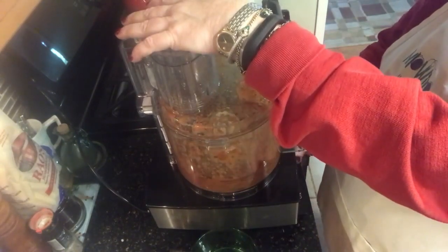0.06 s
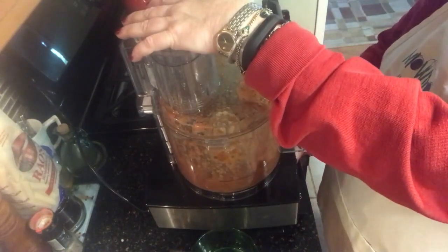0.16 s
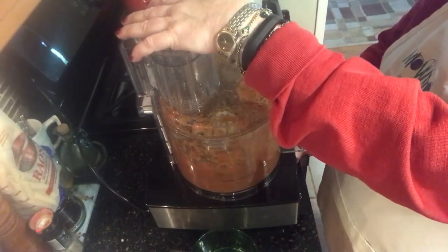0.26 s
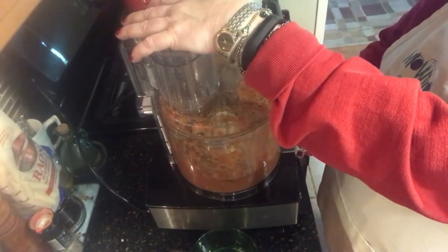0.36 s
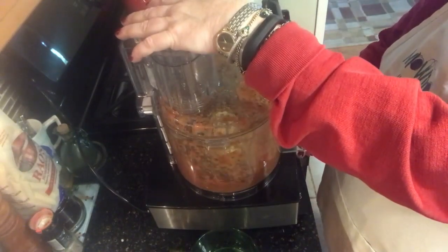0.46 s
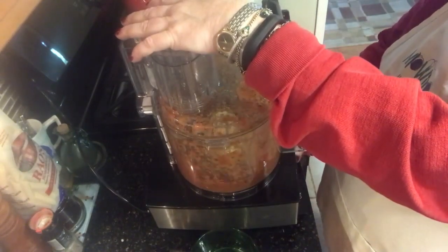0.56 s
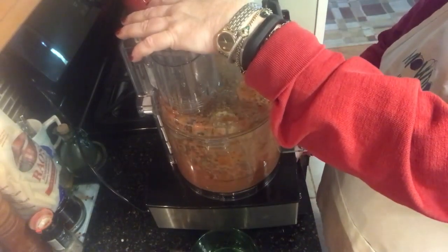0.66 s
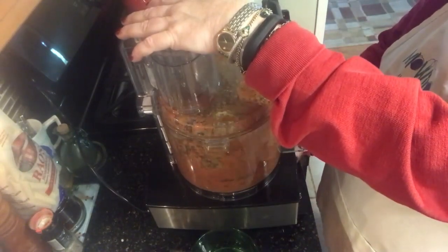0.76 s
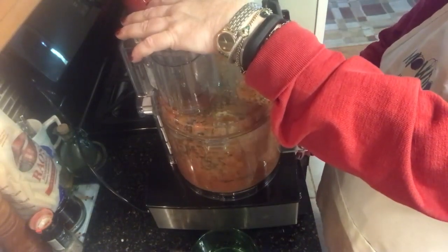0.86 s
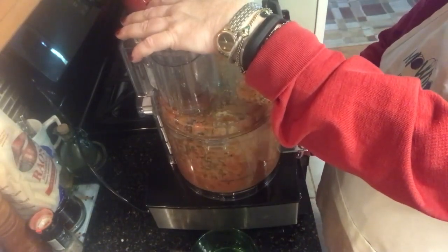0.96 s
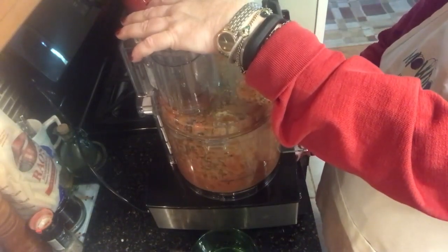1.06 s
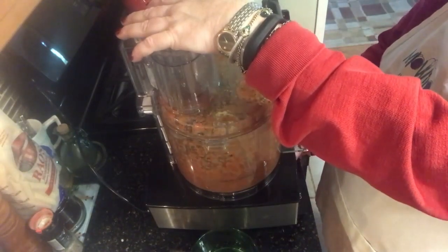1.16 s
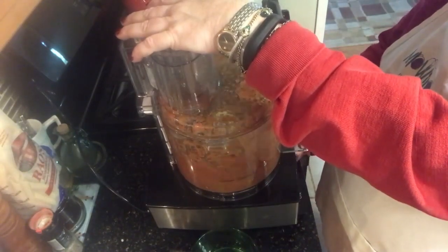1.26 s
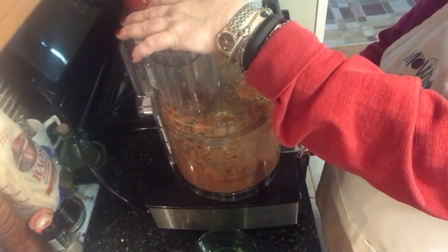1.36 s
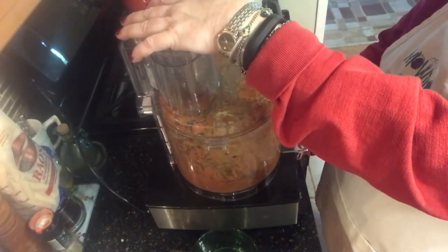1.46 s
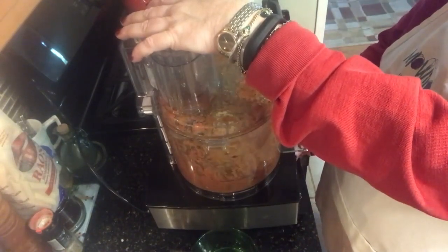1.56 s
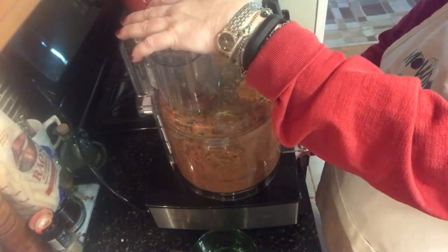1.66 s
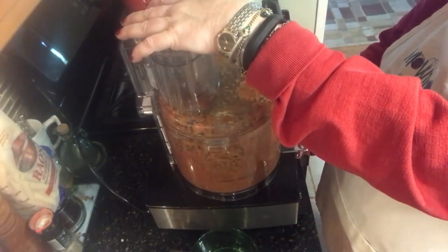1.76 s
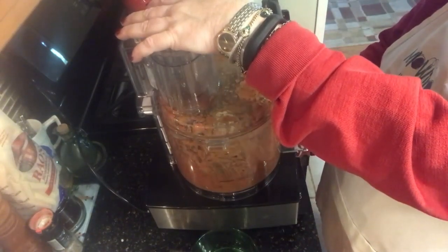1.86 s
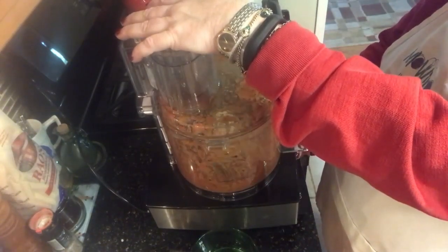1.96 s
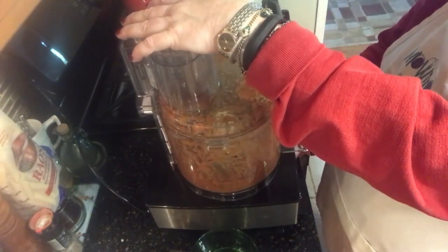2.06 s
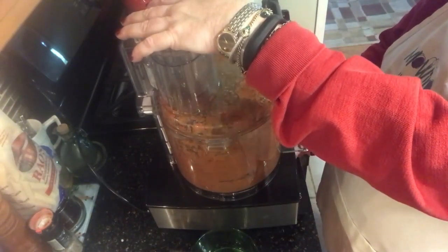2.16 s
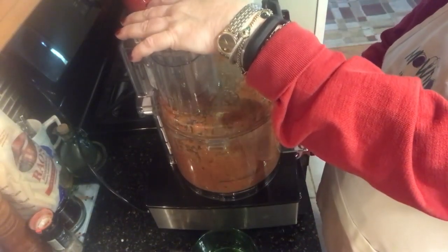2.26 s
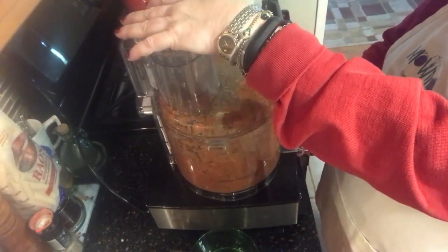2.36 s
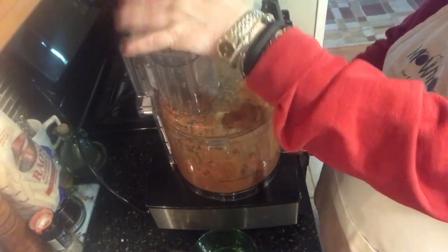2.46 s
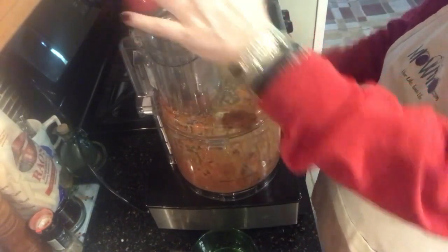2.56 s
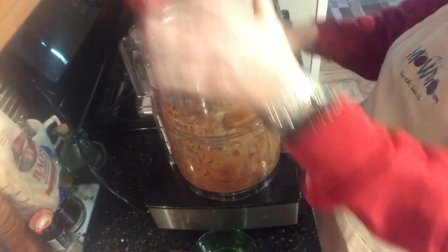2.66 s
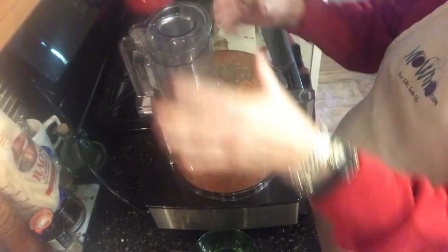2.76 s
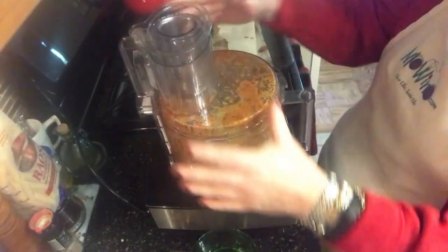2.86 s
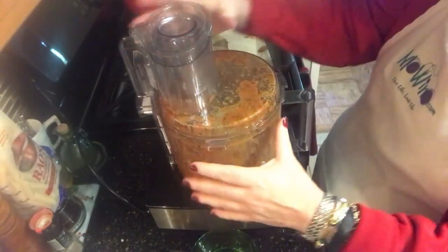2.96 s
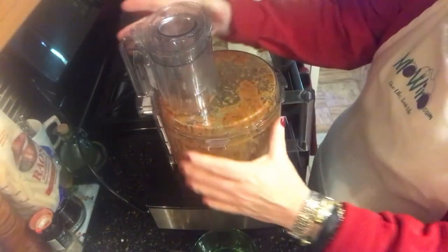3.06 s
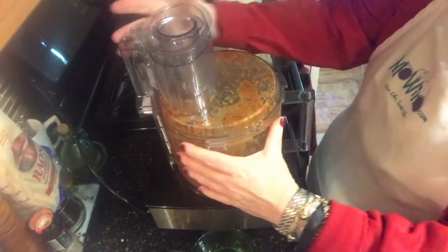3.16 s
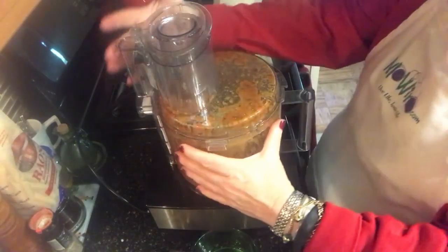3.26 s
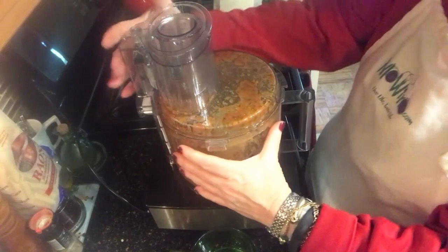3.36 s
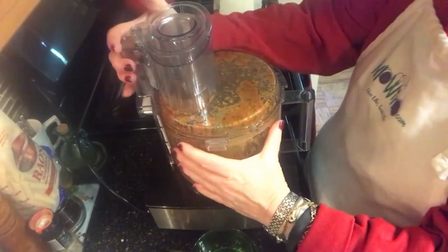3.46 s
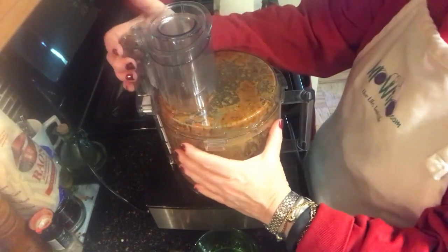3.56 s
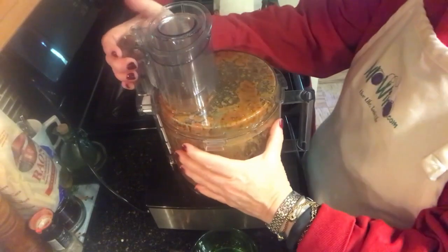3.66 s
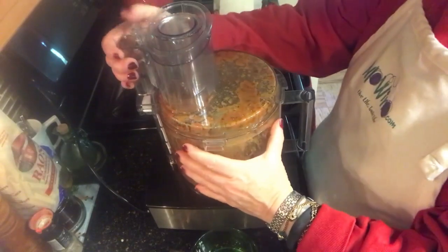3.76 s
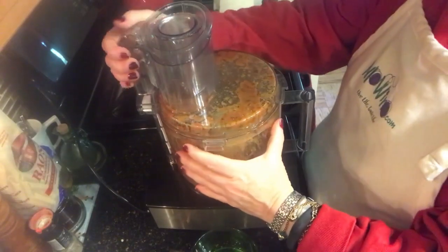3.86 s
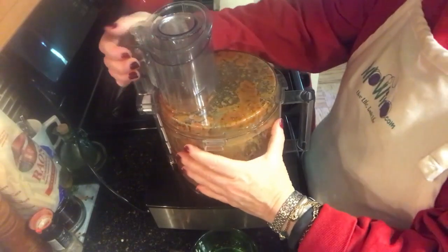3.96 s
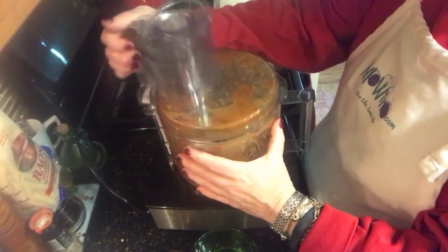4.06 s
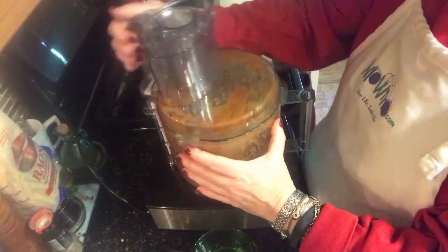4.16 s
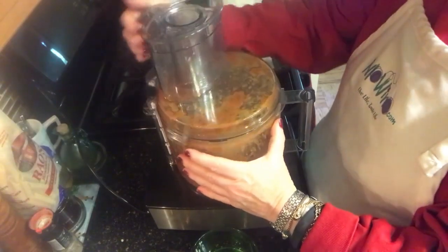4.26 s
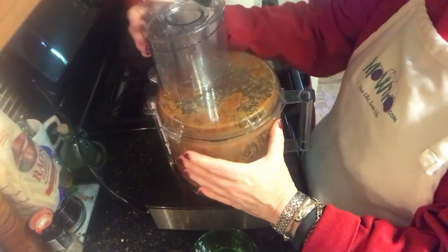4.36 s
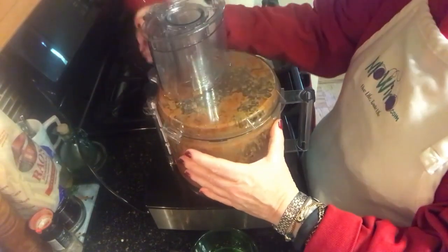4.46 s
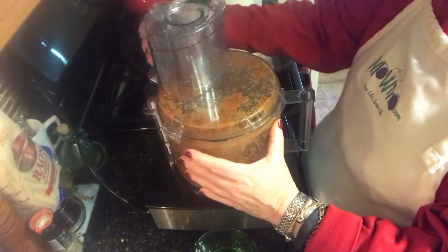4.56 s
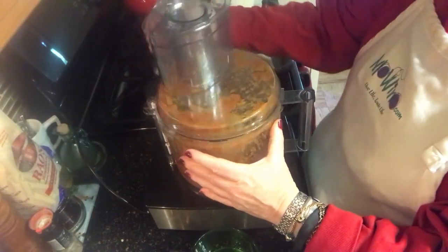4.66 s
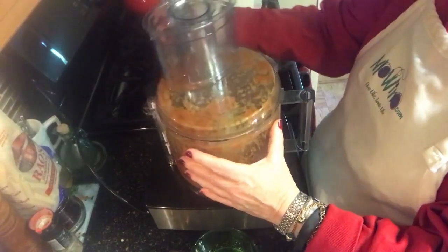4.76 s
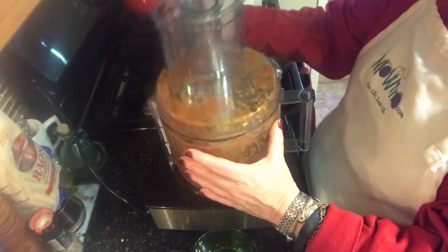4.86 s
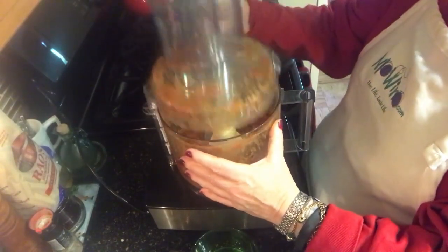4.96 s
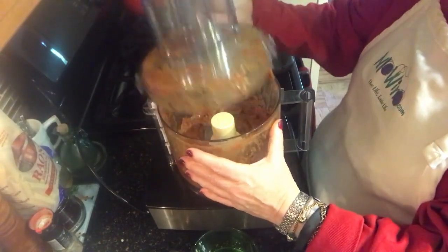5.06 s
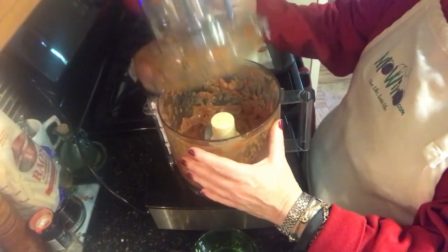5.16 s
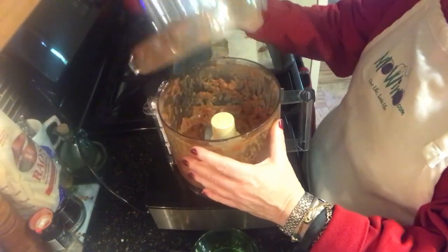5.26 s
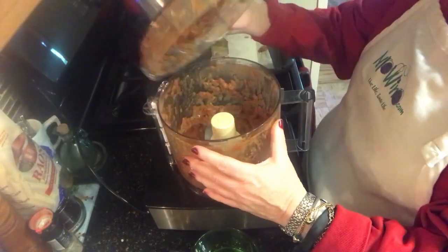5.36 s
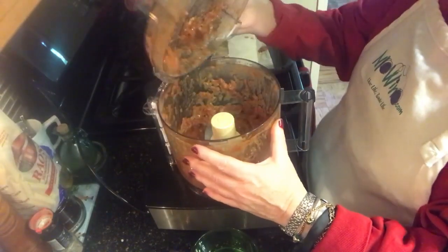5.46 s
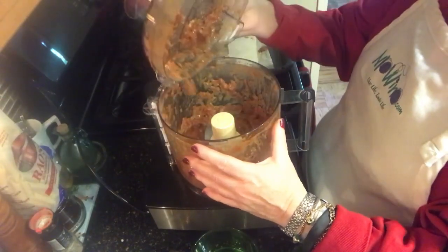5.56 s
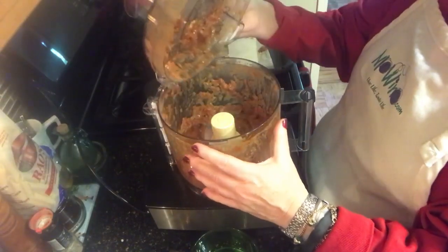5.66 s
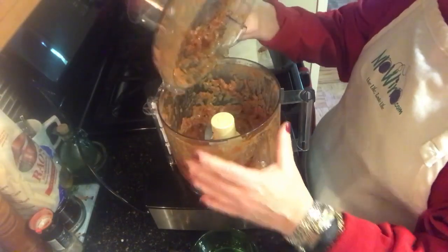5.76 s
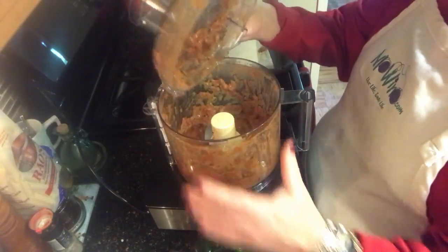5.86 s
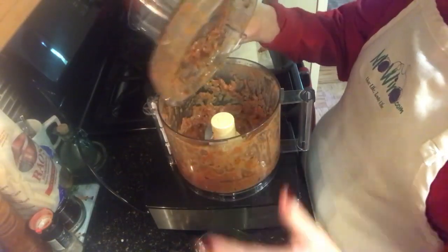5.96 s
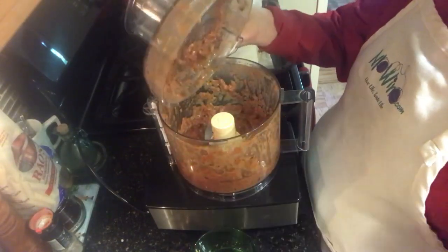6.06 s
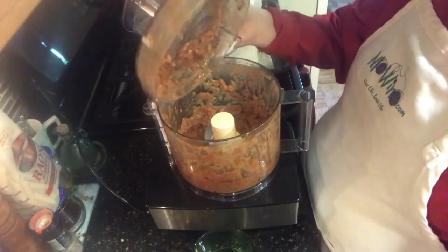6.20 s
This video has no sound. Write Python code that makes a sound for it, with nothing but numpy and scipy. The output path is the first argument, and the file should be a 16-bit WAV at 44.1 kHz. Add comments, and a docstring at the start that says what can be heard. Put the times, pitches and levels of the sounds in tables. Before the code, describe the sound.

Close up in a small, quietly humming kitchen, a food processor is pulsed five times about half a second apart. Each pulse starts with a switch click and thump, then a wet, clattering burst of pieces against plastic with a low rumble, slumping back on release. After a brief pause, plastic contacts rattle and the lid twists with sharp clacks and a scrape, followed by faint handling.

```python
"""Food processor pulsed on a stone counter

Heard close by in a quiet, humming kitchen: five pulses, each with switch clicks, wet vegetable pieces thrown
against the plastic bowl, housing thumps and spray. Then the lid is twisted off with latch clicks, lifted
and handled. Noise bursts and random grains ring the bowl, lid and housing resonances; filtered noise gives
the spray, the brushing hands and the room air; a decaying noise tail gives the kitchen around them."""
import sys
import numpy as np
from scipy import signal
from scipy.fft import rfft, irfft
from scipy.io import wavfile

SR = 44100
rng = np.random.default_rng(int(sys.argv[2]) if len(sys.argv) > 2 else 0)


def waveform_to_disk(signal):
    """Save audio, clipped to [-1, 1], as 16-bit WAV at the path in sys.argv[1]."""
    frames = np.transpose(np.atleast_2d(signal))
    scaled = np.clip(frames, -1, 1) * 32767
    samples = np.round(scaled).astype(np.int16)
    wavfile.write(sys.argv[1], SR, samples)


N = 274743


def from_db(db):
    """Decibels to amplitude gain."""
    return 10 ** (np.asarray(db) / 20)


def rms_one(x):
    """Scale to rms 1."""
    return x / np.sqrt(np.mean(x ** 2) + 1e-20)


def in_time(rows):
    """Interpolate rows of (t/s, value, ...) into one per-sample curve for each value column."""
    s, *columns = np.transpose(rows)
    t = np.arange(N) / SR
    return [np.interp(t, s, column) for column in columns]


def at_hz(points, hz):
    """Read a (f/Hz, level/dB) table on a log-frequency axis."""
    table_hz, table_db = np.array(points).T
    return np.interp(np.log(hz + 1), np.log(table_hz), table_db)


def colour(x, tone):
    """Causal minimum-phase filter with the given spectrum; white noise of rms 1 stays at rms 1."""
    log_gain = np.log(from_db(at_hz(tone, np.fft.rfftfreq(8192, 1 / SR))))
    cepstrum = irfft(log_gain)
    cepstrum[1:4096] *= 2   # fold the cepstrum so that the response starts at once
    cepstrum[4097:] = 0
    response = irfft(np.exp(rfft(cepstrum)))
    return signal.fftconvolve(x, response / np.linalg.norm(response))[:N]


def resonate(x, modes):
    """Parallel two-pole resonances; white noise of rms 1 stays near rms 1."""
    out, power = 0, 0
    for k, (hz, width, level_db) in enumerate(modes):
        r = np.exp(-np.pi * width / SR)
        sign = (-1) ** k   # neighbouring modes have opposite signs
        b = (1 - r * r) / 2 * from_db(level_db) * sign * np.array([1, 0, -1])
        a = [1, -2 * r * np.cos(2 * np.pi * hz / SR), r * r]
        out = out + signal.lfilter(b, a, x + 1e-18)
        power += from_db(2 * level_db) * np.pi * width / SR
    return out / np.sqrt(power)


def drift(rate):
    """Slow random wander of spread 1: noise through two equal low-passes at `rate` Hz."""
    step = 16   # samples between computed points
    r = np.exp(-2 * np.pi * rate * step / SR)
    noise = rng.standard_normal(N // step + 3002)
    slow = signal.lfilter([1], [1, -2 * r, r * r], noise)[3000:]   # drop the settling
    return np.interp(np.arange(N) / step, np.arange(len(slow)), rms_one(slow))


def grains(per_s, spread_db, clump_db):
    """Random impacts of uneven size that swell and thin in clumps; rms 1."""
    born = rng.random(N) < per_s / SR
    sizes = from_db(spread_db * np.minimum(rng.exponential(1, N), 4) + clump_db * drift(27))
    return rms_one(born * sizes * rng.choice([-1, 1], N))


def swell(peak_s, peak_db, rise, fall, start_s=-1, end_s=99, end_fall=0):
    """Gain straight in dB (slopes in dB/s): climbs, sinks, sinks faster after the end; silent before the start."""
    t = np.arange(0, N, 8) / SR
    level_db = peak_db - rise * np.maximum(peak_s - t, 0) - fall * np.maximum(t - peak_s, 0)
    level_db = level_db - end_fall * np.maximum(t - end_s, 0)
    return np.repeat(from_db(level_db) * (t > start_s), 8)[:N]


def near_db(hz, centre_hz, octaves):
    """A contact favours the modes close to its own pitch."""
    return -6 * (np.log2(hz / centre_hz) / octaves) ** 2


# colour of the room air: f/Hz, relative level/dB
AIR_COLOUR = [(15, -55), (25, -23.5), (42, -5.5), (70, -14), (94, -3.5), (114, -17.5), (285, -2.5),
              (384, -16.5), (416, -5.5), (503, -21.5), (591, -16.5), (1440, -21), (2050, -27.5),
              (5570, -32.5), (16000, -44.5)]
# hum tones of the appliances: f/Hz, level/dB, width/Hz
HUM_TONES = [(54, -73.5, 1.1), (79.14, -68.5, 17), (406, -84, 6.5), (480, -84, 7.7), (5416, -93, 16.0)]
AIR_DB = -65.5


def room_tone():
    """The room at rest: steady air and appliance noise, with narrow noise bands as wavering hum."""
    noise = rng.standard_normal(N)
    air = from_db(AIR_DB + 0.8 * drift(3.7)) * colour(noise, AIR_COLOUR)
    hum = 0
    for hz, level_db, width in HUM_TONES:
        tone = resonate(noise[::-1], [(hz, width, 0)])   # reversed, so unlike the air
        hum = hum + from_db(level_db) * rms_one(tone)
    return air + hum


# reverberation of the kitchen by octave-wide band: centre f/Hz, t60/s, relative level/dB
REVERB_BANDS = [(128, 0.59, -2.5), (262, 0.38, 1), (500, 0.34, 0), (1130, 0.39, -4), (1900, 0.32, -2),
                (3930, 0.23, 4), (8000, 0.2373, -7), (13000, 0.33, -5)]


def kitchen(x):
    """Diffuse reverberation: noise builds up in a few ms and dies at its own rate in each band."""
    t = np.arange(SR // 2) / SR
    tail = 0
    for hz, t60, level_db in REVERB_BANDS:
        edges = [hz / np.sqrt(2), hz * np.sqrt(2)]
        band = signal.butter(2, edges, "band", fs=SR, output="sos")
        noise = signal.sosfilt(band, rng.standard_normal(len(t)))
        tail = tail + from_db(level_db - 60 * t / t60) * noise
    tail = tail * (1 - np.exp(-(t / 0.0052) ** 2))
    return signal.fftconvolve(x, tail / np.linalg.norm(tail))[:N]


# high hisses and ticks as hands brush the plastic: t/s, fade time/s, level/dB, centre f/Hz, width/Hz
HAND_BRUSHES = [(2.641, 0.046, -75, 14100, 2500), (4.387, 0.0099, -83.5, 5900, 900),
                (4.444, 0.0069, -82, 3400, 600), (5.135, 0.02, -68.5, 10900, 8000),
                (5.221, 0.0076, -84, 6270, 1500), (5.502, 0.0057, -81, 4070, 500),
                (5.605, 0.016, -62, 8500, 7000), (6.033, 0.021, -76, 8380, 2500)]


def brushes():
    """Hands brush the plastic: short fading puffs of noise, each in its own band."""
    out = np.zeros(N)
    t = np.arange(SR // 10) / SR
    for s, length, level_db, hz, width in HAND_BRUSHES:
        puff = np.exp(-(t / length) ** 2) * rng.standard_normal(len(t))
        band = [(hz, width, 0)]
        start = round(s * SR)
        out[start:start + len(t)] += from_db(level_db) * resonate(resonate(puff, band), band)
    return out


# lid rim sliding on the bowl: strongest at t/s, scrape level/dB before the rim mix, lid singing level/dB
RIM_SLIDES = [(3.994, -52, -45), (4.172, -59, -91), (4.536, -52, -87), (4.625, -61.5, -58.5)]
# the lid mode kept singing: f/Hz, width/Hz, relative level/dB
SINGING_MODE = [(1166, 20, 0)]
SLIDE_RISE, SLIDE_FALL, SONG_FALL = 650, 270, 230   # dB/s


def slides():
    """The rim drags in uneven small slips, which also keep one lid mode singing."""
    scrape = sum(swell(s, db, SLIDE_RISE, SLIDE_FALL) for s, db, _ in RIM_SLIDES)
    song = sum(swell(s, db, SLIDE_RISE, SONG_FALL) for s, _, db in RIM_SLIDES)
    slips = grains(2700, 1.4, 2.5)
    rim = .45 * resonate(scrape * slips, LID_MODES) + .85 * colour(scrape * slips, LID_COLOUR)
    return rim + resonate(song * slips, SINGING_MODE)


def strike(contact, modes):
    """The modes take up all the energy of one contact."""
    ring = resonate(contact, modes)
    return ring * np.linalg.norm(contact) / np.linalg.norm(ring)


# resonances of the motor housing: f/Hz, width/Hz, relative level/dB
HOUSING_MODES = [(45, 30, -14), (87, 72, -9), (135, 27, 0), (210, 25, -3), (304, 29, -7), (379, 39, -1.5),
                 (402.7, 65, -6)]
# treble colour of snaps and spray: f/Hz, relative level/dB
HISS_COLOUR = [(3000, -19.5), (5000, -4), (7000, -1), (9500, -11), (12500, -9), (15500, -10.5)]
RING_PER_HALVING, MIDDLING_T60_S = .15, .055   # short clean contacts leave more of their sound in the ring
SOFT_SNAP_DB, BITE_PER_SNAP = -29.5, 0.22   # snap against shell of a middling contact; dB of bite per dB above


def blows(rows, modes, tone, share, crack):
    """A sharp crack and a dying rattle per blow ring the shell, thump the housing and snap in the treble."""
    rings, broad, bright = np.zeros((3, N + SR))
    t = np.arange(SR // 4) / SR
    for s, peak_db, ring_hz, t60, thud_db, thud_hz, snap_db in rows:
        start = round(s * SR)
        at = slice(start, start + len(t))
        t60 = max(t60, .004)
        fade = from_db(-60 * t / t60) + crack * from_db(-60 * t / 0.00091)
        onset = 1 - np.exp(-t / 0.00032)
        shell, thud, snap = fade * onset * rng.standard_normal((3, len(t))) / [[2], [1], [1]]
        struck = [(hz, width, db + near_db(hz, ring_hz, 0.19)) for hz, width, db in modes]
        thumped = [(hz, width, db + near_db(hz, thud_hz, .6)) for hz, width, db in HOUSING_MODES]

        # hard contacts are brighter; treble dies first
        dull = signal.sosfilt(signal.butter(2, 2200, fs=SR, output="sos"), shell)
        bite_db = np.clip(BITE_PER_SNAP * (snap_db - peak_db - SOFT_SNAP_DB), -12, 12)
        bite = from_db(bite_db - 25 * t / t60) * (shell - dull)

        rung = np.clip(share + RING_PER_HALVING * np.log2(MIDDLING_T60_S / t60), 0, 1)
        broad[at] += from_db(peak_db) * (1 - rung) * (dull + bite)
        rings[at] += from_db(peak_db) * rung * strike(shell, struck)
        rings[at] += from_db(thud_db) * strike(thud, thumped)
        bright[at] += from_db(snap_db) * snap
    return rings[:N] + colour(broad[:N], tone) + colour(bright[:N], HISS_COLOUR)


# lid, latch and pusher contacts:
# t/s, shell level/dB, ring f/Hz, fade t60/s, thud level/dB, thud f/Hz, snap level/dB
LID_CONTACTS = [(3.309, -35, 1030, 0.061, -52, 390, -79), (3.346, -33, 1030, 0.047, -50.5, 240, -64),
                (3.43, -38, 1700, .044, -56, 480, -85), (3.445, -31, 1200, 0.094, -56, 430, -53.5),
                (3.473, -31.5, 1560, 0.038, -50, 130, -45), (3.592, -36, 1450, 0.075, -58, 310, -76),
                (3.6, -27, 1030, .04, -43.5, 254, -55.5), (3.714, -33, 1030, 0.039, -42, 430, -74),
                (3.725, -30.5, 1030, 0.046, -50, 129, -68), (3.832, -40, 1230, 0.045, -47, 170, -95),
                (3.847, -39, 930, 0.053, -43.5, 388, -67.5), (3.931, -40.5, 1050, 0.081, -43, 240, -75),
                (3.946, -21.5, 1700, 0.13, -50, 480, -35), (3.951, -13, 1020, 0.042, -37, 410, -43),
                (3.966, -18.5, 1030, 0.073, -32, 107, -48), (3.989, -13, 1030, 0.046, -29.5, 225, -67),
                (4.019, -27, 1030, 0.031, -40, 420, -66), (4.076, -39, 2870, 0.055, -51, 235, -76),
                (4.118, -34.5, 980, 0.054, -44, 210, -71), (4.163, -37.5, 1040, 0.04, -33.5, 240, -68),
                (4.197, -41, 2850, 0.052, -52, 368, -70), (4.268, -52.5, 1580, 0.076, -56, 238, -90),
                (4.506, -48, 2730, 0.035, -50, 347, -81), (4.532, -33, 2500, .06, -45, 170, -74),
                (4.549, -30, 1040, 0.064, -40.5, 152, -57), (4.571, -38, 2880, 0.048, -49, 290, -72),
                (4.613, -33, 1160, 0.079, -43, 400, -74), (4.823, -43.5, 2696, 0.059, -54.5, 295, -76),
                (5.19, -48, 1067, .04, -74, 255, -80), (5.426, -57, 1050, 0.039, -70, 270, -74),
                (5.605, -51, 1250, 0.061, -73, 363, -51.5), (5.618, -52, 1270, 0.033, -66, 230, -51),
                (5.95, -52.5, 1400, 0.056, -69, 410, -85)]
# resonances of the lid: f/Hz, width/Hz, relative level/dB
LID_MODES = [(915, 79, -4), (1030, 20, 0.5), (1180, 110, -20.5), (1480, 56, 6), (1900, 300, -12),
             (2370, 200, 8), (2560, 250, 5), (3220, 260, -2), (3914, 270, 2), (4437, 200, -20.5),
             (5640, 160, -10)]
# broad colour of the lid: f/Hz, relative level/dB
LID_COLOUR = [(240, -25), (400, -7.5), (774, -17.5), (1030, -5.5), (1240, -9), (2820, -11), (3060, -11.5),
              (5990, -25), (10000, -37), (13000, -61), (22000, -120)]


def lid_clicks():
    """Latch, lid and pusher knock together: short contacts ring the lid."""
    return blows(LID_CONTACTS, LID_MODES, LID_COLOUR, share=0.4, crack=0.44)


# switch contacts when the lever goes down, the motor kicks and the lever comes up:
# t/s after that moment, shell level/dB, ring f/Hz, fade t60/s, thud level/dB, thud f/Hz, snap level/dB
PRESS_CONTACTS = [(0, -36.5, 934, 0.17, -62, 430, -64), (.034, -35, 2400, 0.13, -54.5, 390, -54)]
KICK_CONTACTS = [(-.014, -38, 2500, 0.067, -58, 390, -43.5), (0, -17, 990, 0.037, -34.5, 370, -37)]
RELEASE_CONTACTS = [(0, -36.5, 1900, .06, -41, 391.3, -49), (.014, -29, 1900, .06, -34.5, 390, -40.5)]


def switch_clicks():
    """The same contacts ring the bowl at every lever press, motor kick and lever release."""
    rows = []
    for kick, press, _, _, _, _, _, release, *_ in PULSE_ROWS:
        moments = ((kick - press, PRESS_CONTACTS), (kick, KICK_CONTACTS), (kick + release, RELEASE_CONTACTS))
        for s, contacts in moments:
            rows += [(s + later, *rest) for later, *rest in contacts if s + later >= 0]
    return blows(rows, BOWL_MODES, WALL_COLOUR, share=0.46, crack=0.48)


# single hard knocks in the bowl, pieces striking the wall and some lever-release clicks:
# t/s, shell level/dB, ring f/Hz, fade t60/s, thud level/dB, thud f/Hz, snap level/dB
BOWL_KNOCKS = [(.053, -14.5, 1980, 0.066, -28, 413, -52), (.211, -23.5, 1980, .07, -29.5, 380, -48),
               (.343, -28, 2500, 0.066, -35.5, 380.3, -61), (.529, -17.5, 1170, 0.067, -30, 340, -48),
               (.547, -10.5, 1950, 0.049, -28, 370, -54.5), (.571, -16.5, 1440, 0.071, -30, 130, -54),
               (.645, -32.5, 2540, 0.16, -36.5, 375, -43.5), (.717, -17, 1827, 0.095, -32, 375, -42),
               (.734, -12, 2590, 0.061, -28.5, 414, -47), (.796, -25, 2780, 0.054, -42.5, 372, -63),
               (1.028, -24, 1141, 0.046, -28, 334, -56), (1.069, -19.5, 1631, 0.03, -21.5, 120, -50),
               (1.087, -21.5, 1310, 0.059, -35, 140.6, -48), (1.186, -26, 917, .07, -36.5, 410, -50),
               (1.216, -17.5, 2500, 0.044, -34.5, 382, -54), (1.265, -26, 1163, .042, -44, 365, -60),
               (1.32, -33, 1100, 0.089, -50, 270, -57), (1.345, -37.5, 2580, 0.1, -54.5, 400, -58.5),
               (1.495, -20, 2700, .059, -31.5, 325, -50), (1.516, -12.5, 1950, 0.086, -25, 365, -53),
               (1.641, -28, 1866, .05, -33.5, 400, -50), (1.702, -27, 1830, 0.048, -31.5, 365.4, -61),
               (1.804, -31.5, 1850, 0.15, -38.5, 375, -72), (1.831, -32, 1720, 0.067, -35.5, 195.9, -73.5),
               (2.009, -8.5, 1480, 0.063, -29.5, 135, -57.5), (2.153, -24, 3680, 0.038, -48, 369, -45),
               (2.191, -33, 3100, 0.047, -29, 415, -50), (2.224, -27, 2540, 0.028, -28, 375, -58.5),
               (2.335, -27, 1380, 0.048, -58.5, 240, -86), (2.459, -49.5, 1480, .05, -67, 270, -86),
               (2.485, -52, 2540, .06, -68, 415, -92)]


def bowl_knocks():
    """Single hard knocks, of pieces and some lever releases, each ring the bowl near their own pitch."""
    return blows(BOWL_KNOCKS, BOWL_MODES, WALL_COLOUR, share=0.52, crack=0.48)


# the five pulses, one row each: motor kick t/s, lever pressed t/s before, load thrown t/s after,
# throw level/dB, throw f/Hz, rumble sinks to f/Hz, spray lasts t/s, lever released t/s after the kick,
# load slumps t/s after release, slump level/dB, slump f/Hz, slump dies dB/s,
# spray level/dB at the throw, at the slump (wall levels are before the wall mix)
PULSE_ROWS = [(0.025, .059, 0.053, -27.5, 2000, 280.3, .18, 0.17, 0.027, -36, 2046, 121.5, -45, -52.5),
              (0.508, 0.055, 0.049, -27.5, 1950, 226, .2, 0.18, 0.044, -31.5, 2280, 167, -47, -53),
              (1.009, 0.058, 0.063, -27.5, 1600, 165, 0.18, .162, 0.035, -38.5, 2250, 141, -46, -52),
              (1.475, .063, 0.055, -28, 2100, 250, 0.14, .165, 0.032, -35, 1950, 107, -45.5, -51.5),
              (1.945, 0.053, 0.064, -27, 1480, 197.5, 0.15, 0.2, 0.04, -34, 1860, 184.5, -44, -47)]
THROW_RISE, THROW_FALL, SLUMP_RISE = 190, 182, 480   # dB/s on the wall
RUMBLE_THROW_DB, RUMBLE_SLUMP_DB = -6, -3   # against the wall
RUMBLE_RISE, RUMBLE_FALL, RUMBLE_COAST = 180, 150, 73   # dB/s
BLADE_STOPS_S, STOP_FALL = 0.34, 300   # s after the kick; dB/s
SPRAY_LULL_DB, SPRAY_SAG, SPRAY_FALL = -7, 60, 400   # at the kick against the throw; dB/s; dB/s
SLUMP_SPRAY_FALL, DRIP_DB, DRIP_FALL = 670, -67.5, 110   # dB/s; dB; dB/s
KICK_HZ, COAST_HZ = 1250, 1700   # wall pitch
RUMBLE_HZ, RUMBLE_COAST_HZ, RUMBLE_SINKS_S = 375, 270, .04   # housing pitch; s after the throw


def churn():
    """Each pulse throws the load up the wall; on release it slumps back while the blade coasts to rest."""
    wall, rumble, spray, wall_hz, rumble_hz = 0, 0, 0, [], []
    for (kick, _, throw, throw_db, throw_hz, low_hz, lasts, release, slump, slump_db, slump_hz, dies,
         spray_db, splash_db) in PULSE_ROWS:
        throw, release, stop = kick + throw, kick + release, kick + BLADE_STOPS_S
        slump = release + slump

        wall = wall + swell(throw, throw_db, THROW_RISE, THROW_FALL, kick)
        wall = wall + swell(slump, slump_db, SLUMP_RISE, dies)

        rumble = rumble + swell(throw, throw_db + RUMBLE_THROW_DB, RUMBLE_RISE, RUMBLE_FALL,
                                kick, stop, STOP_FALL)
        rumble = rumble + swell(slump, slump_db + RUMBLE_SLUMP_DB, SLUMP_RISE, RUMBLE_COAST,
                                kick, stop, STOP_FALL)

        spray_rise = -SPRAY_LULL_DB / (throw - kick)
        spray = spray + swell(throw, spray_db, spray_rise, SPRAY_SAG, kick, kick + lasts, SPRAY_FALL)
        spray = spray + swell(slump, splash_db, 0, SLUMP_SPRAY_FALL, release)
        spray = spray + swell(slump, DRIP_DB, 0, DRIP_FALL, release)

        wall_hz += [(kick, KICK_HZ), (throw, throw_hz), (slump, slump_hz), (stop, COAST_HZ)]
        rumble_hz += [(kick, RUMBLE_HZ), (throw + RUMBLE_SINKS_S, low_hz),
                      (release, RUMBLE_HZ), (stop, RUMBLE_COAST_HZ)]
    return wall, rumble, spray, *in_time(wall_hz), *in_time(rumble_hz)


def tumbling(pieces, modes, centre_hz, octaves, patchy_db):
    """Pieces land on ever-changing spots, so each mode is fed by its own share and swells on its own."""
    dealt = rng.integers(0, len(modes), N)
    out = 0
    for k, (hz, width, db) in enumerate(modes):
        level_db = db + near_db(hz, centre_hz, octaves) + patchy_db * drift(22)
        fed = pieces * (dealt == k) * from_db(level_db)
        out = out + resonate(fed, [(hz, width, 0)])
    return out * np.sqrt(np.sum(pieces ** 2) / np.sum(out ** 2))   # keep the energy of the pieces


# resonances of the plastic bowl: f/Hz, width/Hz, relative level/dB
BOWL_MODES = [(664, 34, 4.5), (827, 63, 1.5), (1020, 72, -3.5), (1148, 17, 4.5), (1387, 20, -11),
              (1480, 69, -1), (1830, 170, 6), (1980, 510, -2), (2270, 30, -13), (2500, 160, 4),
              (2780, 240, 5), (2880, 130, 3.5), (3330, 160, -12), (4350, 63, 2), (5600, 200, -9)]
# broad colour of the bowl wall: f/Hz, relative level/dB
WALL_COLOUR = [(240, -41.5), (400, -0.5), (483, -15), (641, 1.5), (733, -2), (1460, -1), (1580, -7.5),
               (2980, -1), (6330, -11), (10000, -63.5), (13000, -90.5), (22000, -120)]


def blade():
    """Dense pieces hit the wall, the unbalanced load shakes the housing, juice sprays."""
    hits, shaking, hiss, wall_hz, rumble_hz = churn()
    pieces = hits * grains(4500, 2.0, 2.12)
    ringing = tumbling(pieces, BOWL_MODES, np.maximum(wall_hz, 500), .75, 4.5)
    wall = .8 * ringing + .6 * colour(pieces, WALL_COLOUR)
    jolts = shaking * grains(600, 2.5, 1.85)
    rumble = tumbling(jolts, HOUSING_MODES, np.maximum(rumble_hz, 60), 1.64, 4.2)
    spray = colour(hiss * grains(9000, 1.3, 2.8), HISS_COLOUR)
    return wall + rumble + spray


def scene():
    """Machine and hands close to a single microphone, the kitchen around them."""
    near = brushes() + slides() + lid_clicks() + switch_clicks() + bowl_knocks() + blade()
    return (room_tone() + from_db(-13.0) * kitchen(near) + near)[None]


def record(dry):
    """The top of the microphone signal is cut steeply, 60 dB down from 16.25 kHz upward."""
    return signal.sosfilt(signal.cheby2(14, 60, 16250, fs=SR, output="sos"), dry)


dry = scene()
out = record(dry)
waveform_to_disk(out)
```